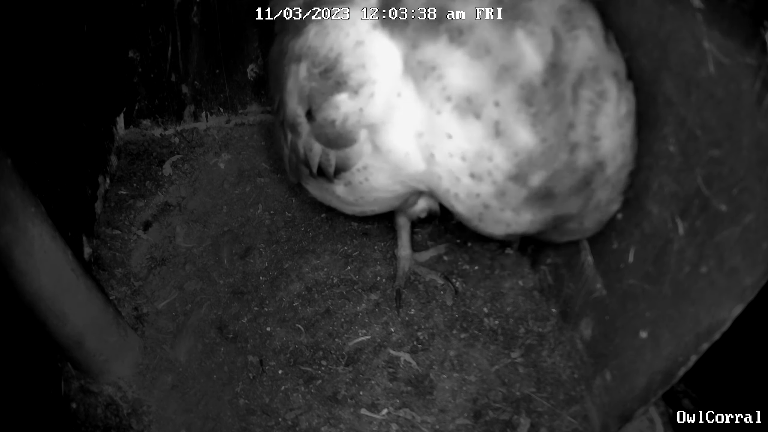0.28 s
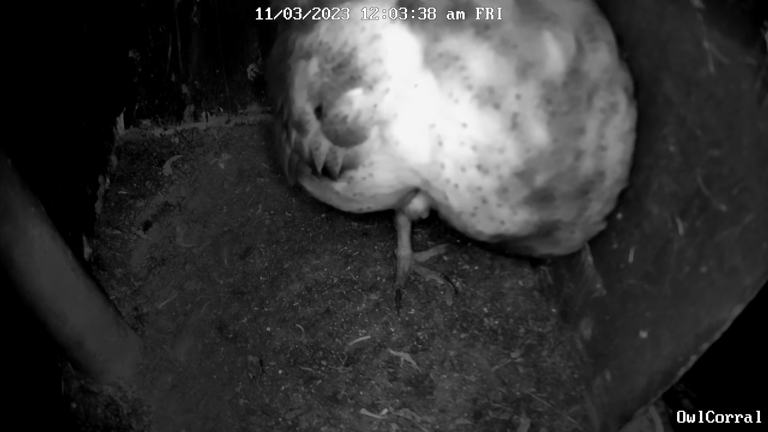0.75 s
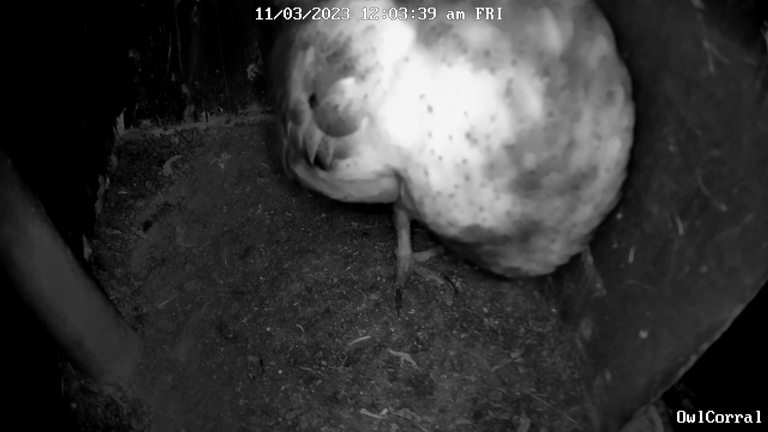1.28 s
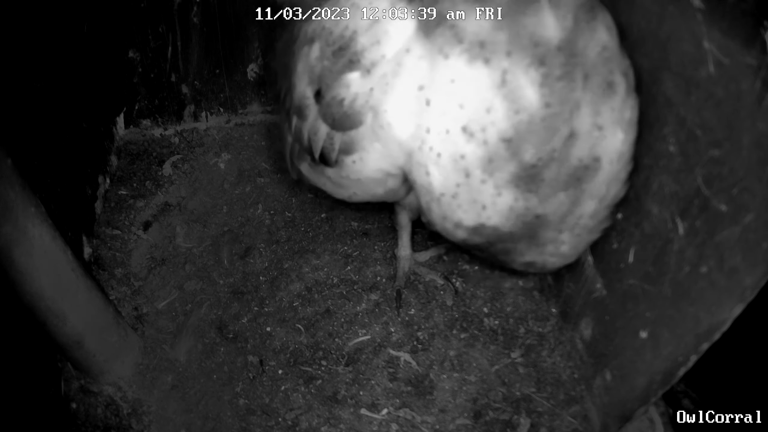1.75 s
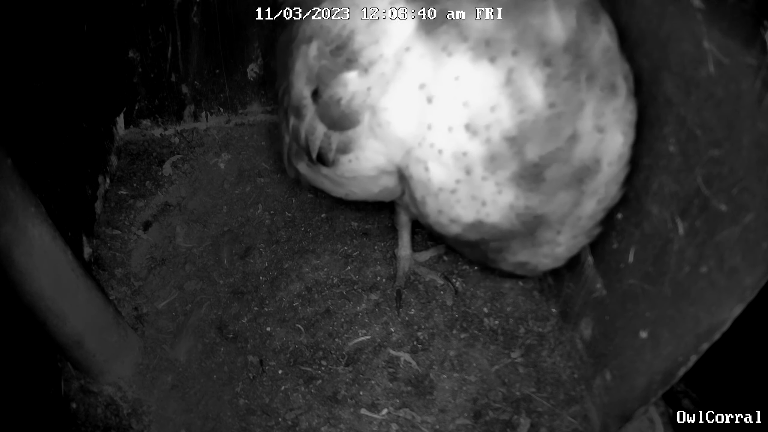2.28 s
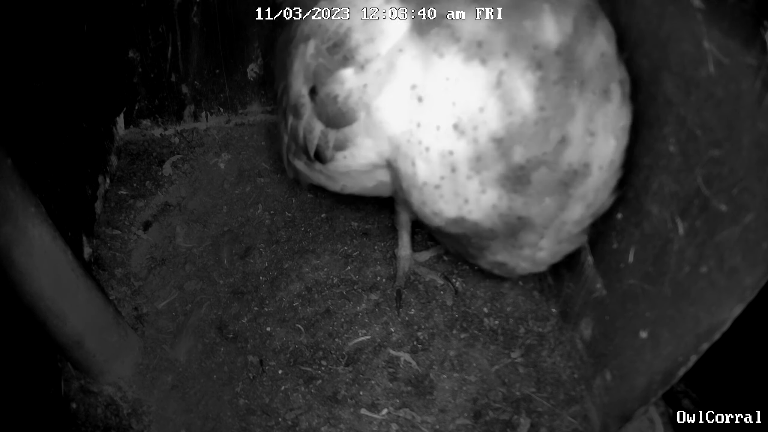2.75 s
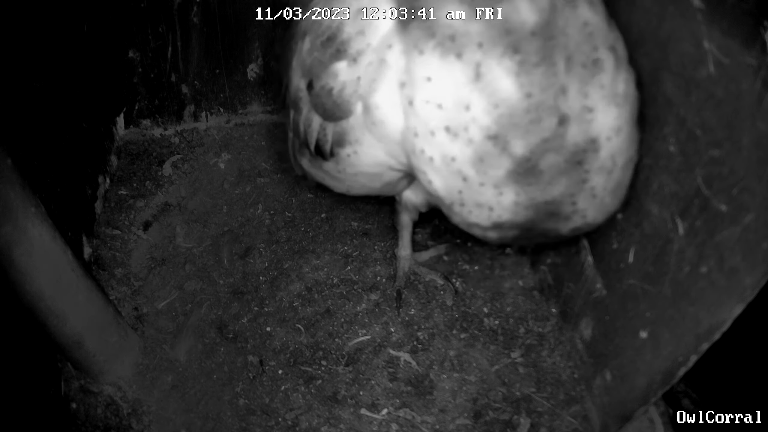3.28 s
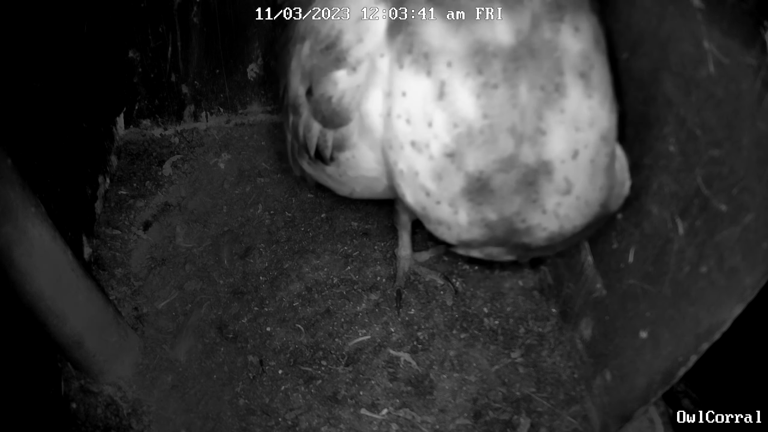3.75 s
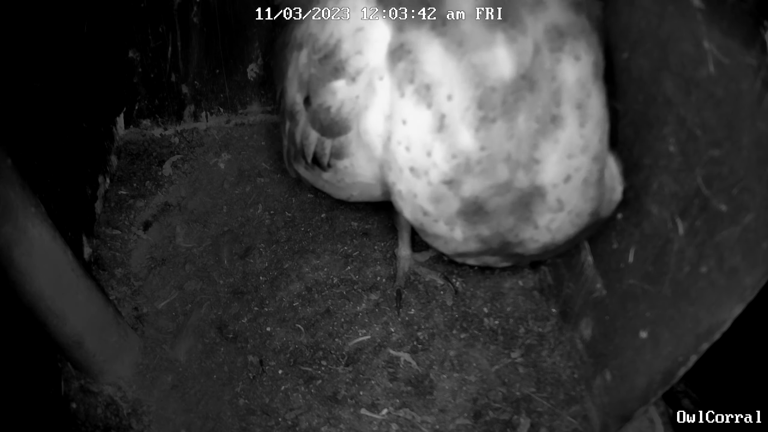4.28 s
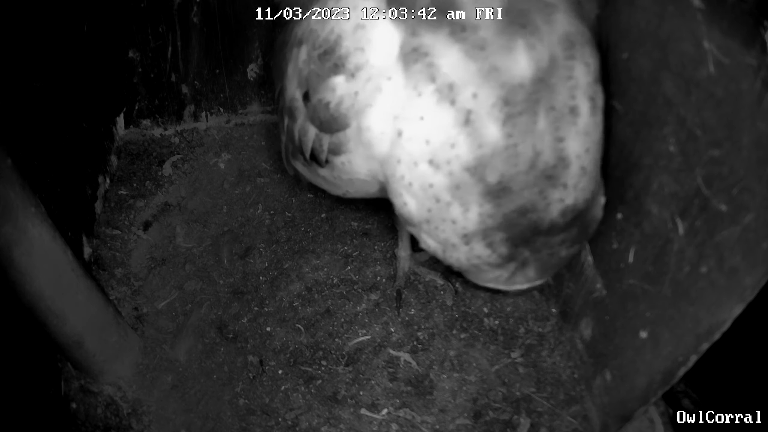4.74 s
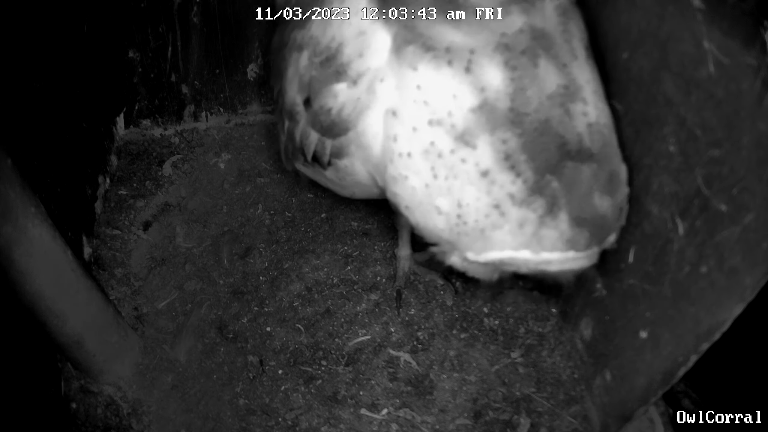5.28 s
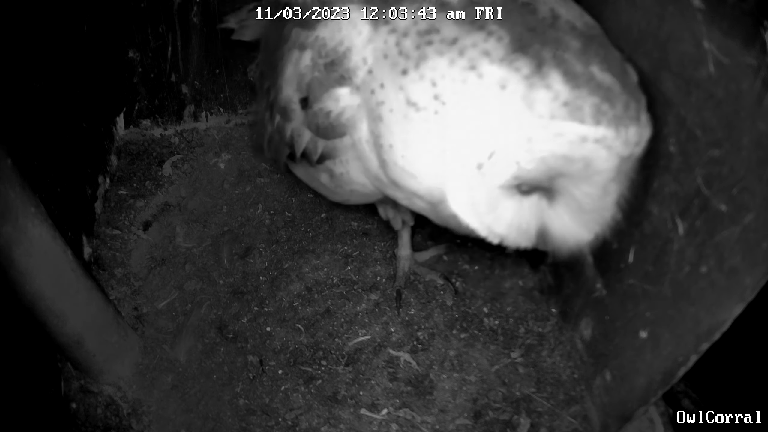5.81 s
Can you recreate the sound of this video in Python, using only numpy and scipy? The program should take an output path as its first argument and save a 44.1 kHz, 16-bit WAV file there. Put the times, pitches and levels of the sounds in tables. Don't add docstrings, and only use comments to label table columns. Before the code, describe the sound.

Faint feather rustles, small hollow clicks and dull foot thumps inside a wooden box, above distant motor drone and buzzing microphone hiss.

```python
import sys
import numpy as np
from scipy import signal
from scipy.fft import rfft, irfft
from scipy.io import wavfile
from scipy.ndimage import uniform_filter1d

SR = 44100
rng = np.random.default_rng(int(sys.argv[2]) if len(sys.argv) > 2 else 0)


def invert_db(x):
    u = np.asarray(x, float) / 20
    return 10 ** u


def output_pcm(signal):
    pcm = np.clip(np.atleast_2d(signal).T, -1, 1) * 32767
    wavfile.write(sys.argv[1], SR, np.round(pcm).astype(np.int16))


N = 265967
T = np.arange(N) / SR
CONTROL = 64

# frequency in Hz, width in Hz, level in dB.
WALL_MODES = [(637, 140, -6.5), (807, 160, 1), (1037, 51, 2.5), (1150, 110, -8)]
AIR_MODES = [(1510, 65, 3.5), (1723, 39, 4), (1926, 63, -2), (2190, 140, -1.5)]
BARB_MODES = [(2700, 260, -3), (3210, 360, -7.5), (3633, 64, -1), (3945, 92, -3.5), (4650, 390, -9)]


def unit(x):
    return x / np.sqrt(np.mean(x ** 2))


def modes(x, table):
    out = 0
    for k, (hz, width, db) in enumerate(table):
        b, a = signal.iirpeak(hz, hz / width, SR)
        out = out + (-1) ** k * invert_db(db) * signal.lfilter(b, a, x)
    return out


def coloured(points):
    hz, db = np.transpose(points)
    log_hz = np.log(np.arange(N // 2 + 1) * SR / N + 1)
    colour = invert_db(np.interp(log_hz, np.log(hz), db, right=-150))
    return unit(irfft(rfft(rng.standard_normal(N)) * colour, N))


def walk(rate):
    hold = int(SR / rate)
    steps = np.repeat(rng.standard_normal(N // hold + 1), hold)
    return unit(uniform_filter1d(uniform_filter1d(steps, hold), hold)[:N])


def ring(hz, t60, rise):
    t = T[:SR // 2]
    y = np.sin(2 * np.pi * hz * t) * (1 - np.exp(-t / rise)) * 1000. ** (-t / t60)
    return y / np.abs(y).max()


def add(out, s, x):
    i = int(s * SR)
    out[i:i + len(x)] += x[:N - i]


def tone(hz, db, sway_db, rate):
    level = np.sqrt(2) * invert_db(db + sway_db * walk(rate))
    cycles = np.cumsum(hz + 0 * T) / SR + rng.random()
    return level * np.sin(2 * np.pi * cycles)


def grains(rate, spread_db):
    slips = (rng.random(N) < rate / SR) * rng.standard_normal(N)
    return slips * invert_db(spread_db * rng.exponential(size=N))


def swell_db(s, hold, db, rise_db_s, fall_db_s):
    t = T[::CONTROL]
    return db - rise_db_s * np.clip(s - t, 0, None) - fall_db_s * np.clip(t - s - hold, 0, None)


def rubbed(gain, drive, table):
    gain = np.repeat(gain, CONTROL)[:N]
    return gain * modes(drive, table) / np.std(modes(drive, table))


def night():
    # frequency in Hz, density in dB per Hz.
    rumble = [(33, -29), (70, -16.5), (120, -12.5), (150, -20.5), (200, -37.5), (300, -33.5), (380, -43),
              (600, -51.5)]
    return coloured(rumble) * invert_db(-62 + 2.57 * walk(8.2))


def hiss():
    # frequency in Hz, density in dB per Hz.
    hiss_colour = [(200, -15), (300, -2), (550, 2.5), (1000, -0.5), (2500, -5), (3500, -6.5), (6000, -8),
                   (8800, -7)]
    return invert_db(-75.5) * coloured(hiss_colour)


def picture_buzz():
    # seconds after its start, level in dB.
    spike_train = [(-.0032, -15.5), (-.0015, -10), (0, -6.5), (.0018, -5), (.0039, -7), (.0058, -17),
                   (.0081, -9)]
    # frequency in Hz, width in Hz, level in dB.
    supply = [(3400, 3000, -5.5), (5950, 940, 3.5), (6730, 100, -4.5)]
    whine_mode = [(7680, 1800, 0)]
    sent = (0, 2, 4, 5, 7, 9, 11, 13)
    first_s, late_s, slots_per_s = .1190, .0016, 15
    buzz_db, fizz_db, whine_db = -63.5, -77, -73.5
    spikes, swell, wide = np.zeros((3, N))
    starts = [first_s + second + k / slots_per_s for second in range(6) for k in sent]
    for start, (late, size) in zip(starts, rng.random((len(starts), 2))):
        start += late_s * (late < .35)
        for s, db in spike_train:
            add(spikes, start + s, invert_db(np.array([db - 2.0 * size])))
        add(swell, start - .007, np.hanning(int(.018 * SR)))
        add(wide, start - .0085, np.hanning(int(.019 * SR)) ** .5)
    buzz = modes(spikes, supply)
    fizz = swell * unit(modes(rng.standard_normal(N), supply))
    whine = wide * unit(modes(modes(rng.standard_normal(N), whine_mode), whine_mode))
    return invert_db(buzz_db) * buzz / buzz.max() + invert_db(fizz_db) * fizz + invert_db(whine_db) * whine


def engines():
    # time in seconds, firing frequency in Hz, level in dB.
    passing = [
        (0, 81.5, -70),
        (.6, 83.16, -60),
        (1.2, 84.97, -53.5),
        (1.8, 86.7, -66),
        (2.3, 87.36, -67.5),
        (2.8, 89.5, -80),
    ]
    idling = [
        (0, 112.8, -61),
        (0.601, 113.5, -61),
        (1.202, 113.9, -53.5),
        (2.2, 118.5, -77),
        (3.2, 115.5, -77.5),
        (3.8, 113.1, -59.5),
        (4.701, 111, -64),
        (5.3, 112.6, -64),
        (6.03, 114.1, -62.5),
    ]
    out = np.zeros(N)
    for table in (passing, idling):
        s, hz, db = np.transpose(table)
        out += tone(np.interp(T, s, hz), np.interp(T, s, db, right=-90), 2.9, 5.44)
    return out


def motors():
    # time in seconds, shaft speed in Hz, load in dB on the upper orders.
    shaft_a = [
        (0, 22.33, -6.5),
        (1.2, 22.39, 7.5),
        (2.2, 22.41, -0.5),
        (3.499, 22.21, -7),
        (4.5, 21.9, -14.5),
        (6.03, 22.28, 0.5),
    ]
    # time in seconds, load in dB on the upper orders.
    load_b = [
        (0, -2),
        (1.0, 1.5),
        (2.3, -2.5),
        (2.95, 2),
        (3.3, -5.5),
        (4.4, 0),
        (4.9, -7.5),
        (6.03, 0.5),
    ]
    # multiple of the shaft speed, level in dB.
    orders_a = [(1, -55.5), (2, -66), (3, -62), (4, -62)]
    orders_b = [(1, -62.5), (2, -60), (3, -64), (4, -65.5), (5, -61.5)]
    hz_b, sway_db = 24.49, 0.73
    s, hz_a, load_a_db = np.transpose(shaft_a)
    hz_a, load_a_db = np.interp(T, s, hz_a), np.interp(T, s, load_a_db)
    load_b_db = np.interp(T, *np.transpose(load_b))
    out = np.zeros(N)
    for k, db in orders_a:
        out += tone(k * hz_a, db + (k > 2) * load_a_db, sway_db * k, 3.5)
    for k, db in orders_b:
        out += tone(k * hz_b, db + (k > 3) * load_b_db, sway_db * k, 6.)
    return out


def box_booms():
    # start in seconds, peak in dB, frequency in Hz, t60 in seconds.
    rocks = [(0.3, -47, 101, 0.14), (0.501, -43, 83.6, 0.22), (0.961, -44.5, 114, 0.32),
             (1.15, -40.5, 112, 0.15), (1.591, -45, 104.3, 0.34), (1.781, -55, 129, 0.11),
             (2.201, -48.5, 125.5, .12), (2.901, -47.5, 120, 0.29), (3.801, -55, 121, 0.22),
             (4.575, -44, 120.2, 0.23), (5.239, -47.5, 125.4, 0.079), (5.872, -44.5, 114, 0.16)]
    out = np.zeros(N)
    for s, db, hz, t60 in rocks:
        add(out, s, invert_db(db) * ring(hz, max(t60, .03), 0.013))
    return out


def foot_thumps():
    # start in seconds, peak in dB, ring frequency in Hz, t60 in seconds.
    steps = [(0.129, -54, 210, 0.012), (0.299, -51, 301, 0.036), (0.525, -46, 296, 0.048),
             (0.825, -63, 310, 0.058), (1.412, -57.5, 310, 0.053), (1.787, -66, 204, 0.054),
             (2.211, -60.5, 202, 0.07), (2.788, -64.5, 194, 0.085), (2.933, -60.5, 200, 0.056),
             (3.147, -62, 213, 0.062), (3.368, -58, 318, 0.054), (3.656, -57.5, 227, 0.042),
             (3.788, -58, 272, 0.076), (3.833, -57, 306, 0.062), (3.856, -51, 297, 0.067),
             (4.428, -61, 292, 0.055), (4.585, -54.5, 285, 0.036), (4.964, -61, 215.9, 0.07),
             (5.187, -62, 204, 0.072), (5.2368, -55.5, 1107, 0.023), (5.239, -55, 299, 0.071),
             (5.839, -64, 484.5, 0.053), (5.937, -58, 462, 0.063)]
    out = np.zeros(N)
    for s, db, hz, t60 in steps:
        add(out, s, invert_db(db) * ring(hz, max(t60, .01), 0.0014))
    return out


def weight_shifts():
    # start of the hold in seconds, hold in seconds, level in dB.
    shifts = [(0.102, 0.062, -74), (0.298, .01, -64.5), (0.476, 0.037, -72.5), (0.508, .01, -62.5),
              (0.606, 0.15, -75), (.822, 0.044, -68), (0.94, 0.077, -75), (1.41, 0.046, -65.5),
              (1.665, .01, -66), (1.765, 0.009, -71), (1.863, .01, -81.5), (2.075, .02, -70),
              (2.202, 0.037, -65), (2.38, 0.018, -79), (2.802, 0.16, -79), (3.063, 0.022, -79),
              (3.477, 0.018, -62.5), (3.607, 0.07, -76), (3.783, 0.0084, -72), (3.86, 0.014, -69.5),
              (3.965, .03, -79.5), (4.428, 0.0088, -69.5), (4.6, .01, -76.5), (4.966, 0.017, -66),
              (5.045, .05, -75.5), (5.189, .03, -69.5), (5.85, .08, -80.5), (5.97, .01, -70)]
    # frequency in Hz, width in Hz, level in dB.
    floor_modes = [(200.5, 32, 0.5), (265, 25, 2), (303.7, 26, 4.5), (410, 36, -7), (468.5, 42, -8)]
    gain = np.zeros(len(T[::CONTROL]))
    for s, hold, db in shifts:
        gain += invert_db(swell_db(s, hold, db, rise_db_s=398.5, fall_db_s=170))
    return rubbed(gain, grains(800, 2.2), floor_modes)


def rustles():
    # start of the hold in seconds, hold in seconds, level in dB, brightness in dB from dull wall to
    draws = [(.05, 0.061, -85.5, 5), (.2, 0.0092, -82.5, -3.5), (0.285, 0.028, -70, -4.5),
             (0.467, 0.038, -71, 2), (.53, 0.017, -74, -0.5), (0.702, 0.047, -72, 0),
             (.822, 0.087, -83.5, 0.5), (.99, 0.026, -86.5, -2.5), (1.362, .02, -76.5, 0),
             (1.438, 0.07, -80.5, -6), (1.796, 0.0082, -82.5, 2), (2.074, .02, -76, 2),
             (2.39, 0.0092, -89, 6), (2.614, .03, -84.5, 2), (2.894, .03, -82.5, -3.5),
             (3.15, 0.031, -79.5, 5), (3.49, 0.024, -80.5, -4.5), (3.458, .01, -81.5, -10),
             (3.598, .05, -74.5, 2.5), (3.788, 0.0075, -76, -2), (3.846, 0.0083, -75.5, 2.5),
             (4.43, .01, -83.5, 8.5), (4.596, 0.0093, -82.5, 3.5), (4.965, .01, -78.5, -4),
             (5.057, 0.0079, -78.5, 4), (5.126, .11, -80.5, 6), (5.9, 0.041, -81, 4)]
    wall_db, barb_db = -3.5, -6.5
    air_loss = 1.2
    wall, air, barb = np.zeros((3, len(T[::CONTROL])))
    for s, hold, db, bright_db in draws:
        level_db = swell_db(s, hold, db, rise_db_s=499.5, fall_db_s=184)
        wall += invert_db(level_db + wall_db - bright_db)
        air += invert_db(level_db - air_loss * max(abs(bright_db) - 2.5, 0))
        barb += invert_db(level_db + barb_db + bright_db)
    slips = grains(3000, 1.6)
    return rubbed(wall, slips, WALL_MODES) + rubbed(air, slips, AIR_MODES) + rubbed(barb, slips, BARB_MODES)


def feather_strokes():
    # start in seconds, length in seconds, frequency in Hz, level in dB.
    sings = [(.278, .04, 1030, -74), (.474, .035, 1500, -67.5), (.495, 0.017, 590, -65.5),
             (.525, 0.019, 680, -67), (.522, .052, 2190, -71), (.32, .03, 1030, -70.5),
             (.751, .028, 1720, -74.5), (0.47, .02, 1000, -80), (.555, 0.016, 1700, -72),
             (.54, .018, 780, -70.5), (1.5, .022, 1640, -76.5), (2.063, 0.023, 1520, -83),
             (3.1, 0.014, 1900, -77), (4.965, 0.0085, 510, -70), (5.946, 0.044, 455, -68)]
    scrapes = [(.13, .013, 1180, -66.5), (.324, 0.018, 1580, -69.5), (.485, 0.032, 2600, -74.5),
               (.526, 0.026, 1800, -63.5), (3.478, 0.016, 786, -69.5), (3.83, .024, 1740, -75),
               (4.961, 0.02, 2400, -74.5), (5.014, 0.018, 2870, -77), (5.054, 0.03, 2740, -74),
               (5.104, .0145, 2900, -78), (5.177, .026, 2860, -79), (5.196, 0.047, 3120, -83)]
    out = np.zeros(N)
    for table, width_hz in ((sings, 63), (scrapes, 750)):
        for (s, length, hz, db), rub in zip(table, rng.standard_normal((len(table), 8192))):
            swell = np.hanning(int(length * SR)) ** .5
            rub = rub[:len(swell)] ** 3 * swell
            rub = np.append(rub, np.zeros(2048))
            sung = modes(modes(rub, [(hz, width_hz, 0)]), [(hz, 2 * width_hz, 0)])
            add(out, s, invert_db(db) * sung / np.std(sung[:len(swell)]))
    return out


def clicks():
    # start in seconds, peak in dB, ring in Hz, puff in dB re the peak.
    strikes = [(.128, -51, 1860, -0.5), (0.1293, -52, 3400, -8), (.464, -65, 2500, 2),
               (.528, -55.5, 483, -8), (.532, -49, 735, -5), (0.5453, -51, 1870, -18),
               (1.368, -66.5, 1630, -13), (2.921, -64, 1490, -9), (3.376, -56, 1750, 2),
               (3.3736, -57.5, 720, 0), (3.4746, -36.5, 125.5, -37), (3.4759, -48, 384, -19),
               (3.4768, -45.5, 786, -10), (3.4766, -46, 1110, -23), (3.600, -44.5, 2270, -11),
               (3.628, -67, 1880, -4), (3.790, -51.5, 2200, 2), (3.799, -67, 3300, 7),
               (3.810, -63, 2200, 2), (3.862, -63, 2700, -8), (3.925, -65.5, 1500, 8.5),
               (4.425, -70, 1500, 6), (5.234, -57.5, 2090, 5.5), (5.938, -65.5, 1000, 5)]
    ring_cycles, puff_s, box_db = 17.8, 0.0017, 5.5
    out, blows = np.zeros(N), np.zeros(N)
    for (s, db, hz, puff_db), puff in zip(strikes, rng.standard_normal((len(strikes), 1024))):
        add(out, s, invert_db(db) * ring(hz, ring_cycles / hz, 0.069 / hz))
        top_hz = 1500 + 1.85 * hz
        band = signal.butter(N=4, Wn=[400, top_hz], btype="band", fs=SR, output="sos")
        puff = unit(signal.sosfilt(band, puff))
        puff = invert_db(db + puff_db) * .5 * puff * np.exp(-T[:1024] / puff_s)
        add(out, s, puff)
        add(blows, s, puff)
    return out + invert_db(box_db) * modes(blows, WALL_MODES + AIR_MODES + BARB_MODES)


def scene():
    behind = night() + hiss() + picture_buzz() + engines() + motors()
    body = box_booms() + foot_thumps() + weight_shifts()
    preening = rustles() + feather_strokes() + clicks()
    return (behind + body + preening)[None]


def roll_off(x):
    return signal.sosfilt(signal.butter(12, 8760, fs=SR, output="sos"), x)


def record(dry):
    opened = dry * np.clip(.2 + T / .003, 0, 1)
    low_pass = signal.butter(N=7, Wn=7750, fs=SR, output="sos")
    return roll_off(signal.sosfiltfilt(low_pass, opened))


dry = scene()
out = record(dry)
output_pcm(out)
```